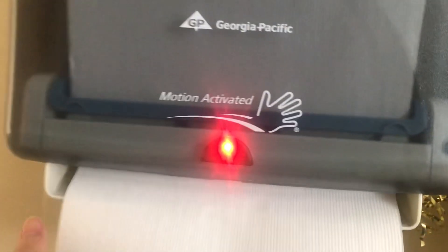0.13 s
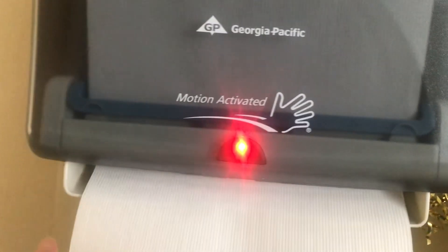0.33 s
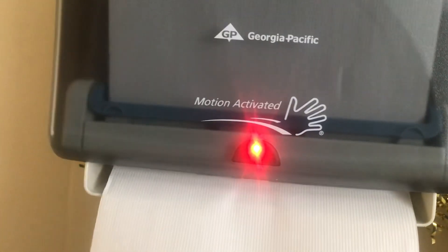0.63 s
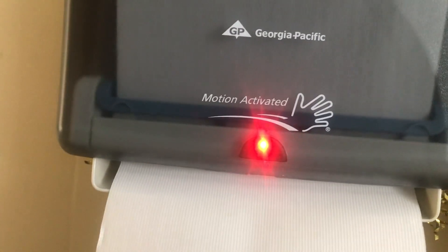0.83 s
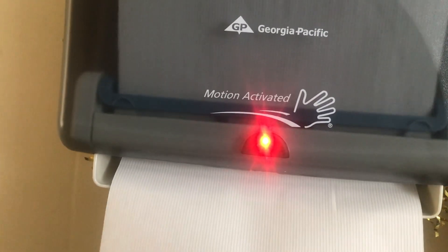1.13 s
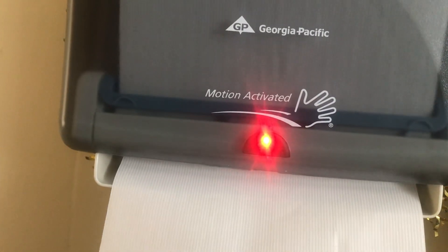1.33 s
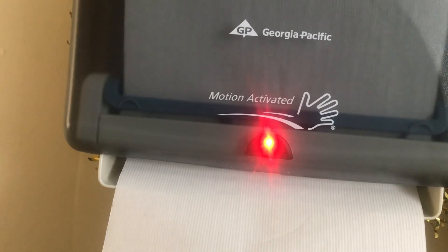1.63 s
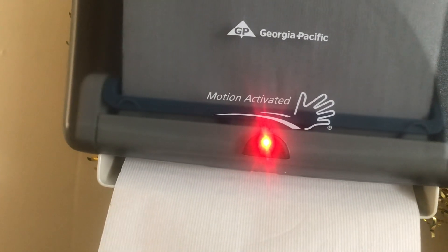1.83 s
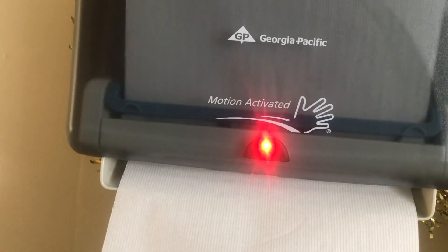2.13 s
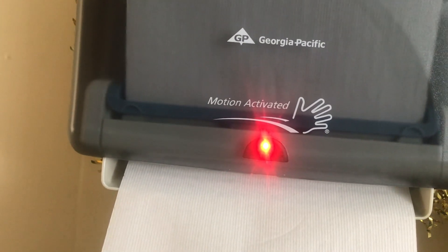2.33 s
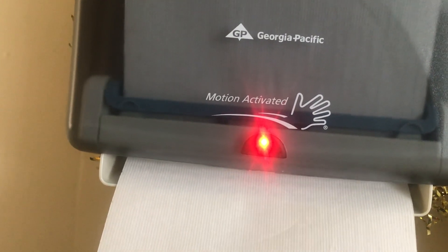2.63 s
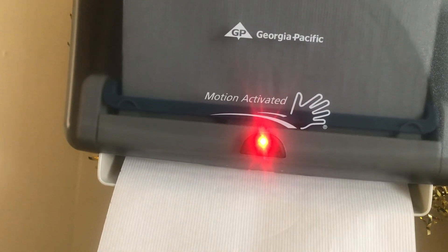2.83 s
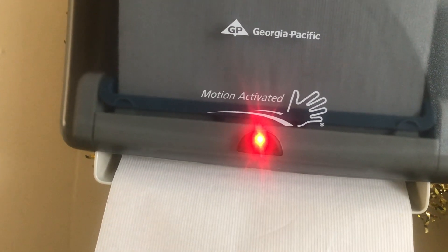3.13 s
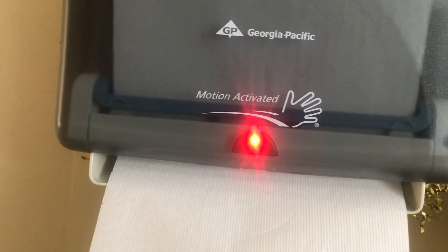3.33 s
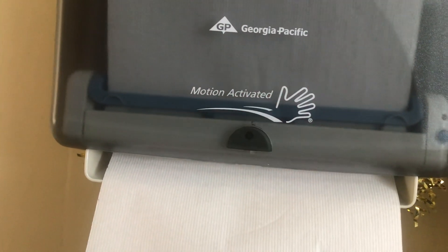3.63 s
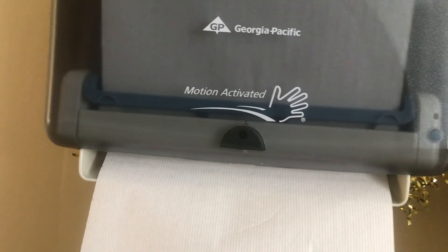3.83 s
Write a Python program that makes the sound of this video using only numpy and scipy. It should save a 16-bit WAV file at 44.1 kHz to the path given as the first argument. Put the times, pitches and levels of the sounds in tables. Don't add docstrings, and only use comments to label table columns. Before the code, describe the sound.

A paper dispenser's small geared motor whines and rattles, stops abruptly, then scrapes and hard clicks.

```python
import sys
import numpy as np
from scipy import signal
from scipy.fft import rfft, irfft, next_fast_len
from scipy.io import wavfile
from scipy.ndimage import uniform_filter1d, map_coordinates

SR = 44100
rng = np.random.default_rng(int(sys.argv[2]) if len(sys.argv) > 2 else 0)


def amplitude_ratio(level_db):
    exponent = np.asarray(level_db, float) / 20
    return 10 ** exponent


def inscribe(sig):
    pcm = np.round(np.clip(np.atleast_2d(sig).T, -1, 1) * 32767)
    wavfile.write(sys.argv[1], SR, pcm.astype(np.int16))


N = 176400
T = np.arange(N) / SR

# (time [s], shaft hum level [dB], gear load level [dB])
MOTOR_EFFORT = [(0.0, -47, -42.5), (0.054, -38.5, -43), (0.136, -56, -44), (0.202, -46, -43),
                (0.676, -41.5, -44), (0.992, -48, -41.5), (1.018, -40.5, -43.5), (1.284, -39, -42),
                (1.33, -45, -41)]
# (shaft order [1], level [dB])
SHAFT_ORDERS = [(2, -57), (4, -59), (8, -49), (16, -53.5), (23, -52), (32, -58.5), (40, -57)]
# (start [s], end [s], shaft order [1], level [dB])
WHINE_SPELLS = [(-.02, 0.035, 8, -46), (0.077, 0.18, 8, -43), (0.261, 0.268, 8, -31.5),
                (0.308, 0.431, 8, -39), (0.466, 0.562, 8, -38.5), (0.636, 0.815, 8, -41),
                (0.865, 0.936, 8, -33), (.955, 0.984, 8, -37), (1.003, 1.066, 8, -37.5),
                (1.093, 1.226, 8, -37), (1.2458, 1.308, 8, -32.5), (1.332, 1.37, 8, -33),
                (0.042, 0.288, 16, -39.5), (.33, 0.4534, 16, -43), (0.45, 0.5642, 16, -35.5),
                (0.624, .82, 16, -42), (.84, 0.994, 16, -39.5), (0.88, 1.192, 16, -42),
                (1.244, 1.327, 16, -36.5), (0.056, 0.27, 32, -45), (0.99, 1.172, 32, -50.5),
                (.25, 0.48, 10, -49), (.6, .8, 10, -54), (1.15, 1.33, 10, -47), (0.83, 1.33, 12, -52),
                (0, 0.2045, 4, -54.5), (.28, 0.613, 4, -54), (0.227, 0.415, 2, -55),
                (0.587, 0.727, 40, -55.5), (0.713, 0.794, 2, -45)]
# (frequency [Hz], density [dB per Hz])
RATTLE_SPECTRUM = [(30, -28), (65, -14), (110, -10), (230, -9), (720, -14), (1000, -7.5), (2600, -10.5),
                   (10000, -34)]
# (frequency [Hz], density [dB per Hz])
BRUSH_SPECTRUM = [(2500, -36), (4000, -6.5), (6000, -10.5), (8300, -14.5), (10300, -20.5), (12500, -15),
                  (16000, -32)]
# (frequency [Hz],
# width [Hz], gain [dB])
HOUSING_MODES = [(317, 170, -4.5), (600, 50, 4), (716, 103, -6), (1178, 54, 2.5), (970, 38, 4),
                 (1264, 70, 4), (1606, 67, 7), (2670, 164, 6), (3680, 95, 4.5), (4130, 260, 6),
                 (5270, 180, 7), (5760, 210, 6.5), (8605, 870, 7)]
# (frequency [Hz], density [dB per Hz])
HUSH_SPECTRUM = [(20, -35.5), (52, -3), (80, -12), (200, -20.5), (650, -29), (1390, -24.5), (1900, -31),
                 (15700, -46.5)]
# (time [s], peak level [dB], centre [Hz])
ROLLER_CLACKS = [
    (.174, -21, 1000),
    (.175, -26, 5000),
    (.371, -26, 2200),
    (.73, -29, 4500),
    (.9602, -16, 950),
    (.961, -28, 2400),
    (.992, -31, 600),
    (1.0, -33, 250),
    (1.31, -29, 8000),
    (1.468, -37, 6000),
]
# (start [s], end [s], level [dB], centre [Hz], spread [octaves])
RUB_STROKES = [(1.333, 1.52, -46.5, 220, 1.1), (1.425, 1.85, -56.5, 150, 0.56), (1.53, 1.8, -64, 750, 0.5),
               (1.92, 2.07, -64, 1470, 1.2), (2.06, 2.2, -66, 5980, 0.33), (2.5, 2.3, -63.5, 3600, 0.62),
               (1.69, 1.76, -52.5, 3000, 0.93), (2.555, 2.62, -56, 2600, .08),
               (2.458, 2.53, -60.5, 3200, 0.72), (2.68, 2.74, -60.5, 1070, 1),
               (1.63, 1.72, -53.5, 2500, 1.02), (1.7, 1.826, -49.5, 2630, 0.96),
               (1.798, 2.09, -57, 2830, 1.18), (2.04, 2.22, -57, 3230, 1.04),
               (2.15, 2.28, -62, 1330, 0.236), (2.32, 2.43, -50.5, 990, 1.2),
               (2.36, 2.46, -41.5, 1170, 1.06), (2.36, 2.45, -50.5, 4700, 0.296),
               (2.37, 2.53, -47, 167, 0.88), (2.436, 2.52, -47.5, 820, 1.01),
               (2.544, 2.619, -43.5, 1240, 1), (2.551, 2.642, -53.5, 4500, 0.69),
               (2.56, 2.67, -55.5, 220, 0.77), (2.619, 2.71, -51, 1700, 0.78),
               (2.725, 2.92, -62.5, 3800, 0.19), (2.697, 2.94, -63, 2100, 0.98),
               (3.08, 3.2, -64.5, 5700, 0.127), (3.105, 3.2, -60, 1800, 0.94),
               (3.223, 3.25, -68, 5000, 0.35), (3.358, 3.563, -63, 5250, 0.23),
               (3.3, 3.77, -63.5, 1560, 0.92), (3.625, 3.8, -70.5, 5500, 0.24),
               (3.89, 3.9, -65.5, 1500, 0.23), (3.115, 3.2, -64, 1390, 0.11),
               (3.4, 3.58, -65.5, 1380, 0.12), (3.6, 3.76, -67.5, 1380, .12), (1.74, 1.85, -56, 2130, .3)]
# (frequency [Hz], width [Hz], gain [dB])
STROKE_COLOUR = [(1390, 130, 6), (950, 140, 4), (2150, 200, 3), (2600, 200, 3), (3450, 150, 3),
                 (8600, 500, 3), (10400, 900, -8), (12500, 1500, 5)]
# (time [s], peak level [dB], centre [Hz], t60 [s])
HARD_BLOWS = [
    (1.653, -48, 3000, .03),
    (1.7679, -33.5, 4200, .016),
    (2.3682, -36, 1600, .02),
    (2.4358, -24.5, 1500, .03),
    (2.4395, -31, 2500, .03),
    (2.452, -33, 800, .03),
    (2.6178, -24, 1500, .04),
    (2.6222, -24, 1800, .05),
    (2.629, -28, 1900, .05),
]
# (time [s], peak level [dB], centre [Hz], t60 [s])
CREASES = [
    (1.665, -46, 2070, .015),
    (1.708, -41, 2400, .02),
    (1.945, -47, 3300, .02),
    (1.9845, -46, 2070, .015),
    (1.998, -46, 1400, .025),
    (2.354, -46, 2570, .015),
    (2.477, -50, 5000, .012),
    (2.55, -48, 1630, .02),
]
# (time [s], peak level [dB], centre [Hz], t60 [s])
SMALL_TICKS = [(2.417, -31.5, 12420, 0.019), (2.438, -34, 8333, 0.012), (2.462, -45, 5700, 0.017),
               (2.493, -48, 6100, .015), (2.572, -44, 2470, 0.013), (2.592, -32.5, 8333, 0.027),
               (2.444, -35.5, 256, 0.136), (2.405, -52, 8300, 0.0122), (2.619, -36.5, 8700, 0.024),
               (2.679, -68, 9000, .015), (2.984, -49, 580, 0.032)]
# (frequency [Hz], level [dB], t60 [s])
PART_MODES = [(900, -6, .09), (1110, -8, .12), (1600, -2, .04), (1782, -1, .05), (2428, 5, .16),
              (3600, -7, .05)]

SHAFT_HZ, SAG_HZ, ROLLER_TURN_S, SLOWEST_S = 129.1, 1.0, .4, .11
CUT_S, COAST_S, STOP_S = 1.33, .17, 1.54
HUM_HELD_S = .08
WHINE_EDGE_S = 0.0291
RATTLE_DB, COAST_LOSS_DB = 7.5, 18.5
BRUSH_DB, BRUSH_LOSS_DB = -39.5, 43
LOOSE_DB, LOOSE_HZ, LOOSE_LOSS_DB = -33, 1027, 12.5
HUSH_DB, DUCK_DB, RECOVER_S = -63, -9, .1
WALLS_S, WALLS_DB = .12, -16
RISE_SHARE, FADE_SHARE = .45, .3
STROKE_TOP_DB, JAGGED_DB, JAGGED_HZ = -22, 2.2, 110
PATCHY_DB = 2.0
KNOCK_S, KNOCK_DB, KNOCK_HELD_S = 2.6255, -39.5, .04
TOP_HZ = 15830

AFTER_CUT = np.clip(T - CUT_S, 0, None)
COASTED = AFTER_CUT / (STOP_S - CUT_S)


def unit(x):
    return x / np.sqrt(np.mean(x ** 2) + 1e-20)


def along(points, hz):
    f, v = np.transpose(points)
    return amplitude_ratio(np.interp(np.log(hz + 1), np.log(f + 1), v))


def bumps(peaks, hz):
    return amplitude_ratio(sum(db / (1 + (2 * (hz - c) / w) ** 2) for c, w, db in peaks))


def band(hz, centre_hz, octaves):
    return np.exp(-.5 * (np.log2((hz + 1) / centre_hz) / octaves) ** 2)


def wobble(rate):
    knots = rng.standard_normal(int(N * rate / SR) + 4)
    return map_coordinates(knots, [T * rate])


def filtered(x, response):
    m = next_fast_len(len(x) + 8192)
    return irfft(rfft(x, m) * response(np.fft.rfftfreq(m, 1 / SR)), m)[:len(x)]


def add(track, s, sound):
    first = round(s * SR)
    track[first:][:len(sound)] += sound[:N - first]


def burst(db, hz, t60, octaves):
    t = np.arange(SR // 8) / SR
    noise = filtered(rng.standard_normal(len(t)), lambda f: band(f, hz, octaves))
    crack = amplitude_ratio(-60 * t / t60) * (1 - np.exp(-t / 0.00028)) * noise
    return amplitude_ratio(db) * crack / np.abs(crack).max()


def order_line(turns, order, db, slip):
    return np.sqrt(2) * amplitude_ratio(db) * np.sin(2 * np.pi * order * turns + slip)


def shaft_hum(speed, turns, hum_db):
    db = hum_db + 1.5 * wobble(25) - 600 * np.clip(AFTER_CUT - HUM_HELD_S, 0, None)
    hum = order_line(np.cumsum(speed) / SR, 1, db, 0)
    for order, db in SHAFT_ORDERS:
        unsteady_db = db + 3 * wobble(12.46) + 3 * wobble(69.7) - 500 * AFTER_CUT
        hum += order_line(turns, order, unsteady_db, 0.82 * wobble(30.02))
    return hum


def mesh_whine(turns):
    whine = np.zeros(N)
    for start, end, order, db in WHINE_SPELLS:
        spell = np.clip(np.minimum(T - start, end - T) / WHINE_EDGE_S + .5, 0, 1)
        unsteady_db = db + 2 * wobble(70.03) + 1.0 * wobble(22.1)
        slip = 0.12 * np.sqrt(order) * wobble(44.9)
        whine += spell * order_line(turns, round(order), unsteady_db, slip)
    return whine


def gear_noise(turns, load_db):
    gate = 1 + 0.12 * np.cos(2 * np.pi * turns) + 0.13 * np.cos(16 * np.pi * turns)
    impacts = rng.standard_normal((3, N)) * gate * amplitude_ratio(1.07 * wobble(300) + 0.67 * wobble(30.48))

    def in_housing(noise, spectrum):
        return unit(filtered(noise, lambda f: spectrum(f) * bumps(HOUSING_MODES, f)))

    rattle = in_housing(impacts[0], lambda f: along(RATTLE_SPECTRUM, f))
    brush = in_housing(impacts[1], lambda f: along(BRUSH_SPECTRUM, f))
    loose = in_housing(impacts[2] * amplitude_ratio(1.5 * wobble(90)),
                       lambda f: band(f, LOOSE_HZ, 0.406) + 0.11 * band(f, 2600, 0.044))
    rattle_db = RATTLE_DB + load_db - COAST_LOSS_DB * COASTED
    brush_db = BRUSH_DB - 2.28 * T - BRUSH_LOSS_DB * COASTED + 0.234 * (load_db - load_db.mean())
    loose_gain = np.clip(AFTER_CUT / 0.051, 0, 1) * amplitude_ratio(LOOSE_DB - LOOSE_LOSS_DB * COASTED)
    return amplitude_ratio(rattle_db) * rattle + amplitude_ratio(brush_db) * brush + loose_gain * loose


def motor():
    s, *levels = np.transpose(MOTOR_EFFORT)
    hum_db, load_db = (np.interp(T, s, level) for level in levels)
    speed = SHAFT_HZ - SAG_HZ * np.cos(2 * np.pi * (T - SLOWEST_S) / ROLLER_TURN_S)
    turns = np.cumsum(speed * np.exp(-AFTER_CUT / COAST_S) + 0.42 * wobble(30.1)) / SR
    halt = amplitude_ratio(-350 * np.clip(T - STOP_S, 0, None))
    return halt * (shaft_hum(speed, turns, hum_db) + mesh_whine(turns) + gear_noise(turns, load_db))


def ventilation_hush():
    hush = unit(filtered(rng.standard_normal(N), lambda f: along(HUSH_SPECTRUM, f)))
    ducked_db = DUCK_DB * np.exp(-np.clip(T - 1.64, 0, None) / RECOVER_S)
    return amplitude_ratio(HUSH_DB + 0.31 * wobble(4.32) - 2.24 * (T - 4.0) + ducked_db) * hush


def wall_reflections(x):
    t = np.arange(SR // 2) / SR
    decay = rng.standard_normal(len(t)) * amplitude_ratio(-60 * t / WALLS_S)
    tail = filtered(decay, lambda f: (f > 400) / (1 + f / 3000))
    return amplitude_ratio(WALLS_DB) * signal.fftconvolve(x, tail / np.linalg.norm(tail))[:N]


def roller_clacks():
    out = np.zeros(N)
    for at, db, hz in ROLLER_CLACKS:
        add(out, at, burst(db, hz, .017, .45))
    return out


def patchy(x, depth_db):
    z = signal.stft(x, nperseg=256)[2]
    field = uniform_filter1d(rng.standard_normal(z.shape), size=4, axis=0)
    field = uniform_filter1d(field, size=8, axis=1)
    return signal.istft(z * amplitude_ratio(depth_db * unit(field)), nperseg=256)[1][:len(x)]


def rubbing():
    out = np.zeros(N)
    t = np.arange(SR * 6 // 10) / SR
    for start, end, db, hz, octaves in RUB_STROKES:
        jagged = amplitude_ratio(JAGGED_DB * rng.standard_normal(200))

        def colour(f):
            air = amplitude_ratio(STROKE_TOP_DB) * (f > hz) * (hz > 1000)
            own = np.interp(f / JAGGED_HZ, range(200), jagged)
            return (band(f, hz, octaves) + air) * bumps(STROKE_COLOUR, f) * own

        grain_db = 1.12 * wobble(155.2)[:len(t)] + 1.2 * wobble(23.5)[:len(t)]
        grit = unit(filtered(rng.standard_normal(len(t)) * amplitude_ratio(grain_db), colour))
        length = end - start
        moments = [0, .012, min(RISE_SHARE * length, .07), (1 - FADE_SHARE) * length, length, length + .05, 1]
        shape_db = np.interp(t, moments, [-40, -11, 0, -2, -8, -32, -300])
        add(out, start, amplitude_ratio(db + shape_db) * grit)
    return patchy(out, PATCHY_DB)


def snaps():
    out = np.zeros(N)
    for at, db, hz, t60 in SMALL_TICKS + HARD_BLOWS + CREASES:
        add(out, at, burst(db, hz, t60, 0.89))
    return out


def ringing_part():
    out = np.zeros(N)
    t = np.arange(SR // 4) / SR
    ring = sum(amplitude_ratio(db - 60 * t / t60) * np.sin(2 * np.pi * hz * t) for hz, db, t60 in PART_MODES)
    grip = amplitude_ratio(-1100 * np.clip(t - KNOCK_HELD_S, 0, None))
    add(out, KNOCK_S, amplitude_ratio(KNOCK_DB) * (1 - np.exp(-t / 0.0015)) * grip * ring)
    return out


def scene():
    close = motor() + roller_clacks() + rubbing() + snaps() + ringing_part()
    return (close + wall_reflections(close) + ventilation_hush())[None]


def low_pass(x):
    return signal.sosfilt(signal.butter(12, 15840, fs=SR, output="sos"), x)


def record(dry):
    mix = filtered(dry[0], lambda f: f < TOP_HZ)[None]
    return low_pass(mix)


dry = scene()
out = record(dry)
inscribe(out)
```